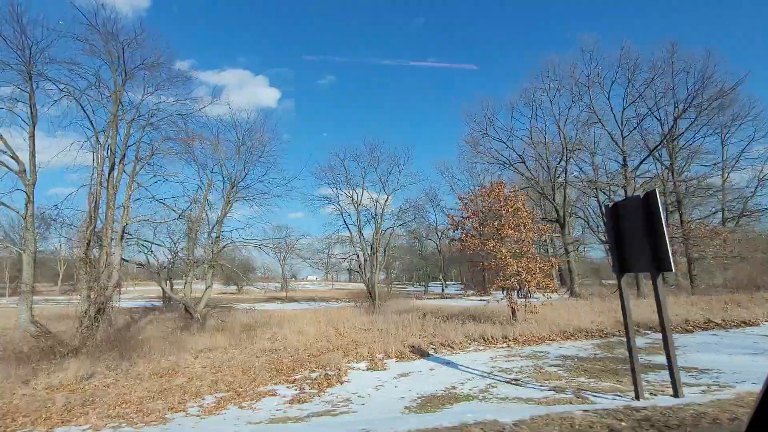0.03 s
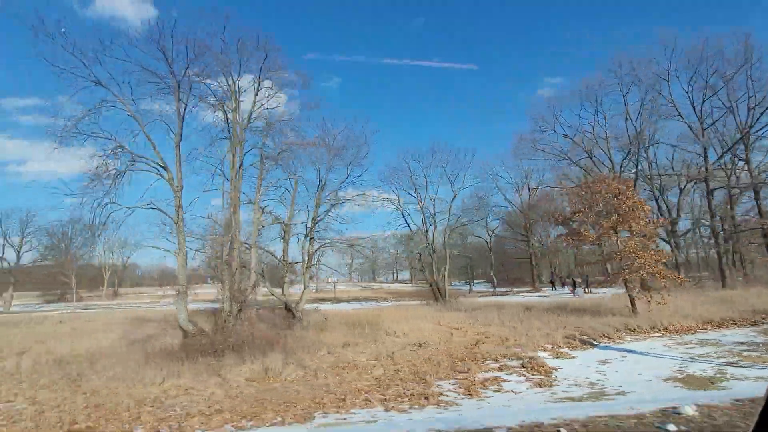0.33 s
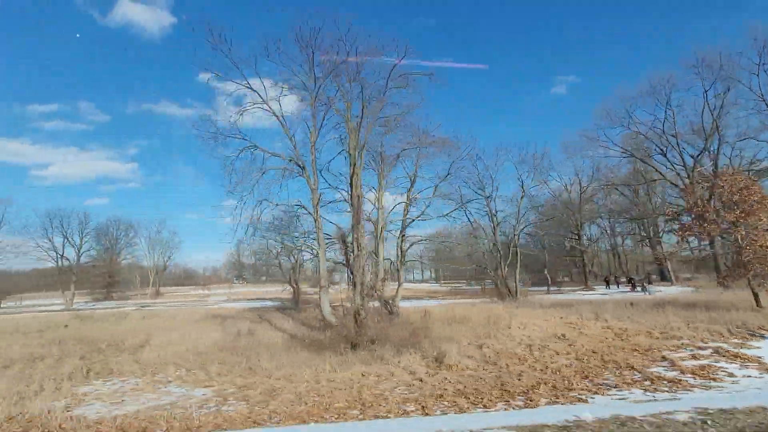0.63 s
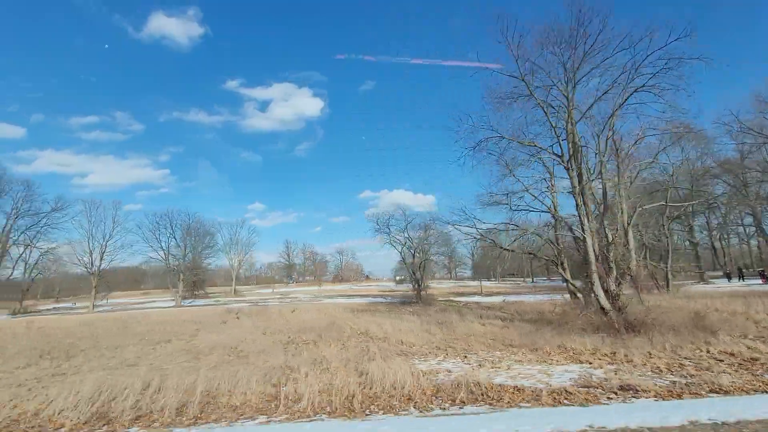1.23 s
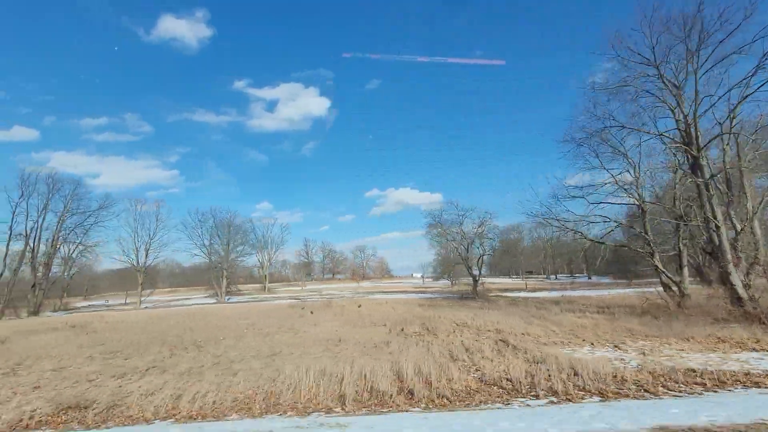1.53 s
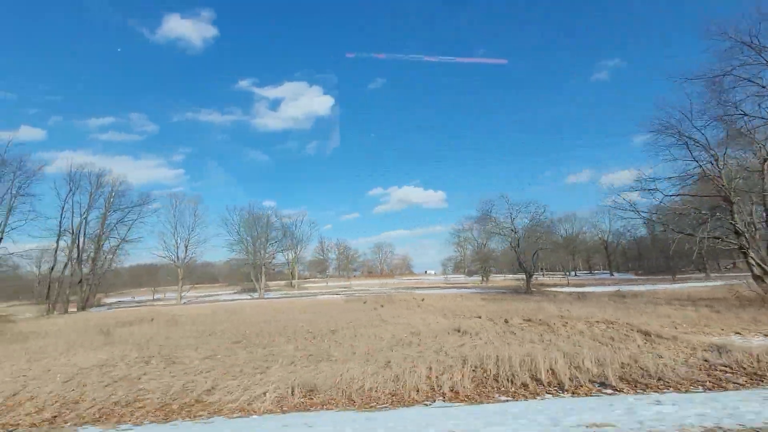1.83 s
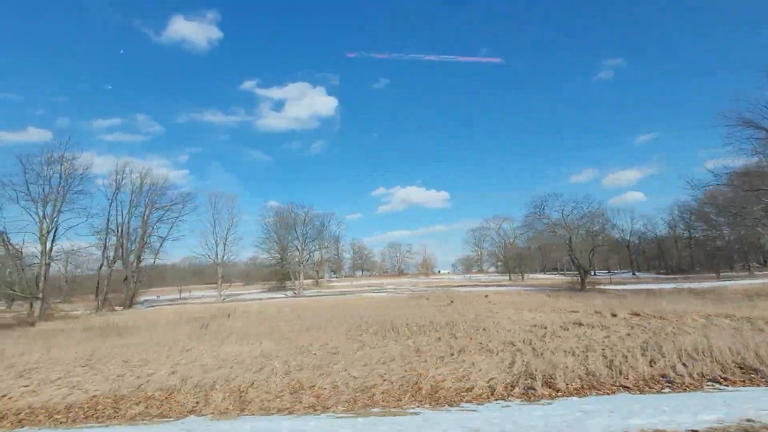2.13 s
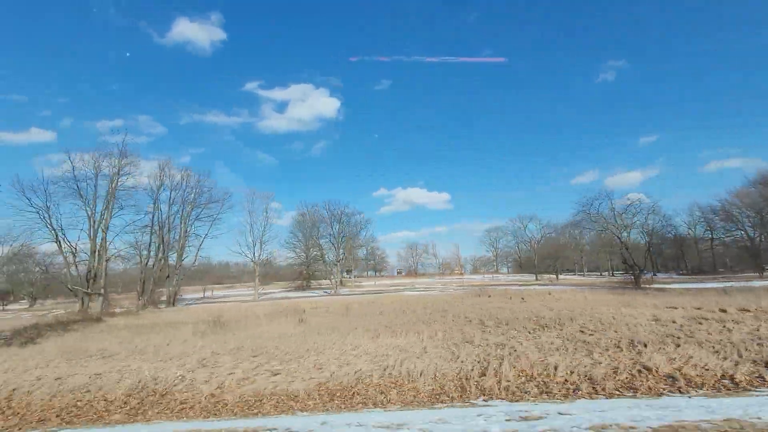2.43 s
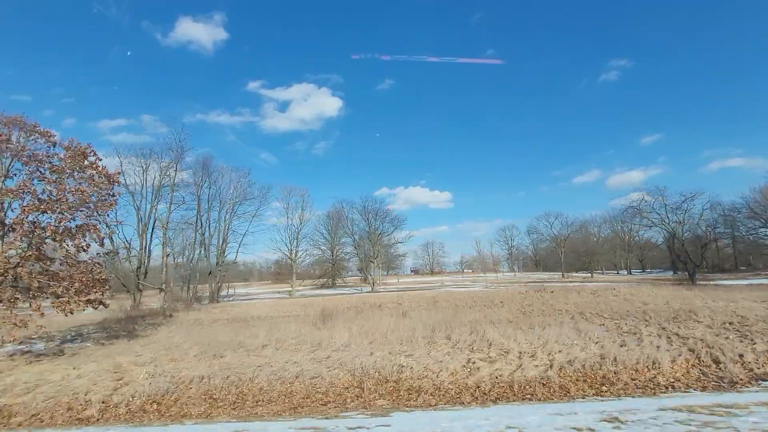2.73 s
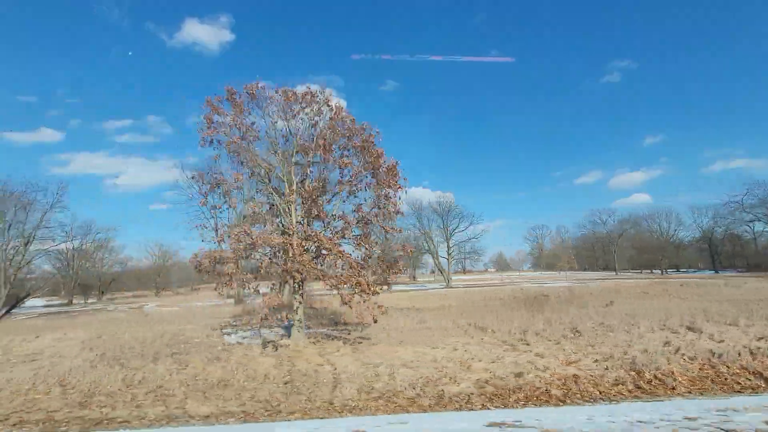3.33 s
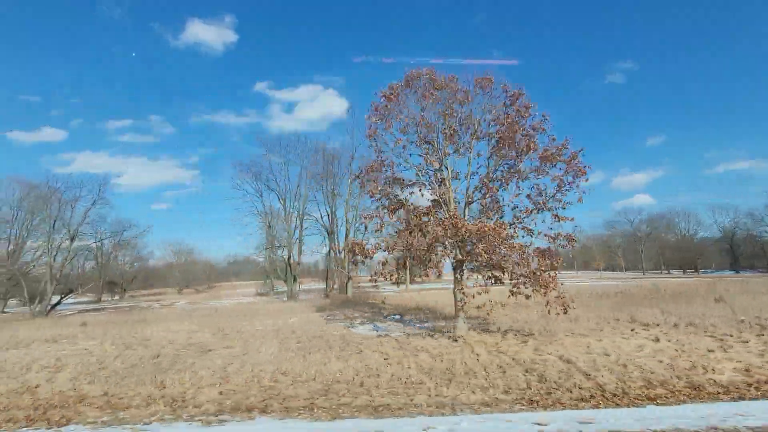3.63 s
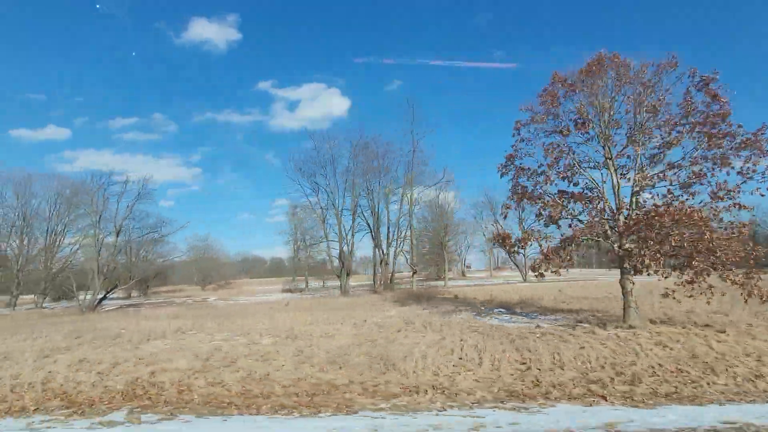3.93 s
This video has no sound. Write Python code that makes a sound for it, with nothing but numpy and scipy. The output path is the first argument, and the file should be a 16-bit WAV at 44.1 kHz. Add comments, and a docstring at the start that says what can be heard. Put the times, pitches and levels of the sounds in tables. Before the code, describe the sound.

Low rumble and tyre drone run throughout inside a car driving along a park road. Bumps thump early and again from the middle, with small rattles and two short scuffs near the left microphone, beside a side window.

```python
"""Inside a car rolling along a park road, close to a side window.
Uneven pavement heaves the body and booms in the cabin. The air in the tyres drones; the tread roars,
most over a coarse patch half way. Loose trim ticks and clinks on the bumps and squeaks faintly.
Two brief hissing scuffs pass close to the left microphone; air hisses thinly along the window."""
import sys
import numpy as np
from scipy import signal
from scipy.fft import rfft, irfft
from scipy.io import wavfile
from scipy.ndimage import uniform_filter1d

SR = 44100
rng = np.random.default_rng(int(sys.argv[2]) if len(sys.argv) > 2 else 0)


def pcm_store(signal):
    """Save signal as 16-bit PCM."""
    levels = np.round(np.clip(np.atleast_2d(signal), -1, 1) * 32767)
    wavfile.write(sys.argv[1], SR, levels.astype(np.int16).T)


N = 176400
T, HZ = np.arange(N) / SR, np.fft.rfftfreq(N, 1 / SR)

# pavement bumps: start_s, heave_db, shake_db, knock_db
BUMPS = [(0.324, -20.5, -17.5, -25.5), (.496, -14.5, -23, -20.5), (.69, -27.5, -32, -31),
         (1.675, -22.5, -24.5, -23.5), (1.84, -23.5, -19, -20.5), (1.914, -20, -13.5, -24.5),
         (2.094, -18, -25, -21.5), (2.22, -19.5, -40, -39), (2.667, -36, -22.5, -36),
         (2.697, -15.5, -37, -35), (2.818, -15, -25.5, -26), (3.23, -21.5, -20, -27.5),
         (3.409, -18, -24.5, -23), (3.6, -21, -34, -39), (3.921, -22.5, -29, -39)]
# body heave between bumps: time_s, level_db
HEAVE_LEVEL = [(0, -29), (1.5, -28), (2.2, -24), (2.5, -30), (4, -33)]
# body rumble: freq_hz, gain_db
RUMBLE_SPECTRUM = [(10, -33), (25, -7.5), (47, 6.5), (62, -4), (80, -8.5), (120, -55), (4000, -170)]
# cabin shake between bumps: time_s, gain_db
SHAKE_GAIN = [(0, -26.5), (1.6, -26.5), (2.0, -25.5), (2.35, -27), (4, -29)]
# cabin boom: freq_hz, gain_db
BOOM_SPECTRUM = [(40, -41.5), (75, -4), (125, -7), (160, -1.5), (192, -7.5), (262, -6.5), (305, -11),
                 (400, -12.5), (580, -23.5), (4000, -130)]
# cabin resonances: freq_hz, width_hz, lift_db
CABIN_MODES = [(82, 16, 7), (116, 23, 14), (445, 40, 2)]
# ringing of the tyre air: time_s, level_db
CAVITY_LEVEL = [(0, -38.5), (.48, -28), (.7, -35), (1.55, -39), (1.85, -27.5), (2.1, -28.5), (2.35, -36),
                (4, -38)]
# tyre air resonances: freq_hz, width_hz
CAVITY_MODES = [(229, 32), (249, 17)]
# road coarseness as roar gain: time_s, gain_db
SURFACE_GAIN = [(0, -49.5), (.5, -48.5), (1.05, -49), (1.65, -48.5), (1.95, -46), (2.13, -46),
                (2.29, -49.5), (2.48, -48), (2.8, -48), (3.1, -50), (3.42, -48.5), (4, -49)]
# tread roar per side: freq_hz, gain_db
ROAR_LEFT_SPECTRUM = [(150, -8), (500, -3.5), (690, 1), (880, -2.5), (1080, -7.5), (1500, -8.5),
                      (2000, -13), (2500, -19.5), (3100, -20), (4000, -25.5), (5200, -28), (6200, -36),
                      (7900, -34), (8500, -41), (15500, -48)]
ROAR_RIGHT_SPECTRUM = [(150, -8), (500, -3.5), (700, -2), (950, -2), (1250, -9), (1900, -9.5), (2500, -19),
                       (3550, -31), (4400, -26), (5200, -28), (6200, -34), (7800, -35), (8500, -41),
                       (15500, -50)]
# dry ticks: start_s, level_db, pan_db, decay_s, lowest_hz
# the row at 2.3188 s is the sharp onset of the second scuff, close to the left microphone
TICKS = [(.3102, -53.5, 3, .003, 3500), (.3294, -53.5, 2, .01, 5000), (.3434, -51.5, 1, .003, 4000),
         (.5012, -57, 0, .009, 3000), (.5256, -56, 1, .003, 4000), (1.5836, -45, 7, .003, 4000),
         (1.9305, -57, -1, .01, 10500), (2.1108, -52, -1, .008, 3300), (2.3188, -55, 14, .006, 3300),
         (2.538, -50, 6, .004, 7500), (2.6548, -53.5, 1, .004, 10500), (2.822, -58, 4, .004, 4500)]
# ticks and chatter: freq_hz, gain_db
TICK_SPECTRUM = [(4600, 0), (8000, -1), (10000, -4), (12500, 0), (15500, -2)]
# clinks of a loose part: start_s, level_db, decay_s
CLINKS = [(.3434, -53, .005), (.5012, -54.5, .02)]
# its resonances: freq_hz, width_hz, gain_db
CLINK_MODES = [(3900, 1400, -5), (4850, 1000, -1), (6900, 2600, -2)]
# scuffs: start_s, rise_s, hold_s, decay_s, left_db, pan_db
SCUFFS = [(1.557, .013, .018, .002, -44, 18), (2.3188, .001, .028, .022, -52, 24)]
# scuff hiss: freq_hz, gain_db
SCUFF_SPECTRUM = [(1500, -24), (3000, -9), (3800, 0), (5200, 3), (8100, 1), (8800, -4), (15500, -4.5)]
# trim squeaks: start_s, length_s
SQUEAK_TIMES = [(3.362, .018), (3.81, .12)]
# tone of each squeak: pitch_hz, width_hz, level_db
SQUEAK_TONES = [(7400, 3800, -62), (2970, 420, -61.5)]
# window hiss: freq_hz, gain_db
AIR_SPECTRUM = [(3000, 0), (7100, -3), (7850, 5), (8600, -5), (11200, 2), (12100, -7), (14300, -3)]
# window hiss: time_s, level_db
AIR_LEVEL = [(0, -76), (1.1, -75.5), (2.7, -79), (4, -84.5)]
# likeness of the two microphones: freq_hz, coherence
MIC_COHERENCE = [(120, .98), (250, .96), (310, .76), (460, .76), (550, .05), (670, -.4), (850, .05)]
# phase between them: freq_hz, left_lead_rad
MIC_PHASE = [(50, .48), (120, .18), (200, .18), (430, -.2), (1000, 0)]
# balance between them: freq_hz, left_minus_right_db
MIC_BALANCE = [(25, -3), (100, .5), (280, -1), (360, -4), (450, -4), (530, 0)]

HEAVE_COLUMN, SHAKE_COLUMN, KNOCK_COLUMN = 1, 2, 3
KNOCK_BASE_DB, KNOCK_DECAY_S = -27, .092
CONTACT_RISE_S = .0012


def amp(db):
    """Decibels to gain."""
    return 10 ** (np.asarray(db) / 20)


def unit(x):
    """Scale to rms 1."""
    return x / np.sqrt(np.mean(x ** 2) + 1e-20)


def over_hz(points, hz=HZ):
    """Interpolate over log frequency."""
    knots_hz, values = np.transpose(points)
    return np.interp(np.log(hz + 1), np.log(knots_hz + 1), values)


def over_time(points, time_s=T):
    """Interpolate over time."""
    return np.interp(time_s, *np.transpose(points))


def pan(db):
    """Stereo gains for a left-minus-right level."""
    return amp(np.array([[db], [-db]]) / 2)


def resonance_db(hz, width_hz):
    """Steep-sided peak."""
    return -20 * np.log10(1 + (2 * (HZ - hz) / width_hz) ** 2)


def mic_spectra(hz, shape):
    """Random spectra at the two microphones: alike in the bass, unrelated in the treble."""
    shared, separate = rng.standard_normal((2, *shape)) + 1j * rng.standard_normal((2, *shape))
    coherence = np.clip(over_hz(MIC_COHERENCE, hz), -1, 1)
    right = coherence * shared + np.sqrt(1 - coherence ** 2) * separate
    lag = np.exp(-1j * over_hz(MIC_PHASE, hz))
    tilt = amp(over_hz(MIC_BALANCE, hz) / 2)
    return np.array([shared * tilt, right * lag / tilt])


def noise(colour_db):
    """Coloured stereo noise, rms 1."""
    return unit(irfft(mic_spectra(HZ, HZ.shape) * amp(colour_db), N))


def steadied(x, samples=3000):
    """Flatten a noise's slow chance swells to rms 1."""
    power = uniform_filter1d(uniform_filter1d((x ** 2).mean(0), samples), samples)
    return x / np.sqrt(abs(power) + 1e-9)


def bump_envelope(base_db, column, decay_s, rise_s=.011):
    """Base shaking plus a quick rise and slower fall per bump, summed in power."""
    power = amp(base_db) ** 2
    for bump in BUMPS:
        age_s = T - bump[0]
        shape = np.clip(age_s / rise_s, 0, 1) * np.exp(-np.maximum(age_s - rise_s, 0) / decay_s)
        power = power + (amp(bump[column]) * shape) ** 2
    return np.sqrt(power)


def body_rumble():
    """The body shudders on its springs."""
    heave = bump_envelope(over_time(HEAVE_LEVEL), HEAVE_COLUMN, decay_s=.096)
    return steadied(noise(over_hz(RUMBLE_SPECTRUM))) * heave


def cabin_boom(split_hz=177):
    """Road shake drives the low cabin resonances; floor panels knock above them."""
    lift_db = sum(db / (1 + (2 * (HZ - hz) / width_hz) ** 2) for hz, width_hz, db in CABIN_MODES)
    boom = noise(over_hz(BOOM_SPECTRUM) + lift_db)
    low = irfft(rfft(boom) / (1 + (HZ / split_hz) ** 10), N)
    shake = bump_envelope(over_time(SHAKE_GAIN), SHAKE_COLUMN, decay_s=.049)
    knock = bump_envelope(KNOCK_BASE_DB, KNOCK_COLUMN, KNOCK_DECAY_S)
    return low.std() * steadied(low) * shake + (boom - low) * knock


def tyre_drone():
    """Air inside the tyres rings at two close modes."""
    ring = sum(noise(resonance_db(*mode)) for mode in CAVITY_MODES)
    return steadied(ring, samples=4000) * amp(over_time(CAVITY_LEVEL))


def tyre_roar(gain_db=4.5, patchy_db=.5, flicker_db=1):
    """Tread noise through the glass: slightly patchy, louder and brighter on coarse pavement."""
    size, hop = 512, 128
    frames, hz = N // hop + 5, np.fft.rfftfreq(size, 1 / SR)
    surface_db = over_time(SURFACE_GAIN, np.arange(frames) * hop / SR)[:, None]
    brighter_db = np.clip(hz / 4000, 0, 1) * (surface_db - surface_db.mean())
    drift = uniform_filter1d(rng.standard_normal((frames, len(hz))), size=24, axis=0)
    patches = unit(uniform_filter1d(drift, size=7, axis=1))
    flicker = unit(uniform_filter1d(rng.standard_normal((frames, 1)), size=8, axis=0))
    base_db = np.array([over_hz(ROAR_LEFT_SPECTRUM, hz), over_hz(ROAR_RIGHT_SPECTRUM, hz)])[:, None]
    colour_db = base_db + brighter_db + patchy_db * patches + flicker_db * flicker
    spectra = mic_spectra(hz, patches.shape) * amp(colour_db)
    _, roar = signal.istft(spectra.transpose(0, 2, 1), nperseg=size, noverlap=size - hop)
    return unit(roar[:, :N]) * amp(gain_db + over_time(SURFACE_GAIN))


def tick(start_s, level_db, pan_db, decay_s, lowest_hz, tail_db=-14, tail_s=.018):
    """Dry tick with a short cabin tail: loose trim, or the sharp onset of the second scuff."""
    age_s = np.maximum(T - start_s, 0)
    fall = np.exp(-age_s / decay_s) + amp(tail_db) * np.exp(-age_s / tail_s)
    shape = np.minimum(age_s / CONTACT_RISE_S, 1) * fall
    highpass_db = -10 * np.log10(1 + (lowest_hz / (HZ + 1)) ** 10)
    return noise(over_hz(TICK_SPECTRUM) + highpass_db) * shape * amp(level_db) * pan(pan_db)


def clink(start_s, level_db, decay_s):
    """A small hard part, jolted, rings briefly."""
    age_s = np.maximum(T - start_s, 0)
    shape = np.minimum(age_s / CONTACT_RISE_S, 1) * np.exp(-age_s / decay_s)
    ring = sum(amp(db) * noise(resonance_db(hz, width_hz)) for hz, width_hz, db in CLINK_MODES)
    return unit(ring) * shape * amp(level_db)


def scuff(start_s, rise_s, hold_s, decay_s, left_db, pan_db, grain_db=.5):
    """Short grainy hiss of something rubbing beside the left microphone."""
    age_s = T - start_s
    shape = np.clip(age_s / rise_s, 0, 1) * np.exp(-np.maximum(age_s - rise_s - hold_s, 0) / decay_s)
    grain = unit(uniform_filter1d(rng.standard_normal(N), size=50))
    hiss = unit(noise(over_hz(SCUFF_SPECTRUM)) * amp(grain_db * grain))
    return hiss * shape * amp([[left_db], [left_db - pan_db]])


def trim_squeak(start_s, length_s, pitch_hz, width_hz, level_db):
    """Faint fuzzy squeak of trim, swelling and fading."""
    progress = np.clip((T - start_s) / length_s, 0, 1)
    shape = np.sqrt(abs(np.sin(np.pi * progress)))
    return noise(resonance_db(pitch_hz, width_hz)) * shape * amp(level_db) * pan(db=4)


def trim_chatter(level_db=-75, rate_per_s=900, spread_db=2.5, decay_s=.002, jolt_db=-6.5):
    """Many tiny contacts, louder on coarse road and after each bump."""
    hits = (rng.random(N) < rate_per_s / SR) * amp(spread_db * np.minimum(rng.exponential(1, N), 3))
    shape = signal.lfilter([1], [1, -np.exp(-1 / (decay_s * SR))], hits)
    surface_db = over_time(SURFACE_GAIN)
    coarseness = amp(7.6 * (surface_db - surface_db.max()))  # 7.6 dB per dB of roar
    knock = bump_envelope(KNOCK_BASE_DB, KNOCK_COLUMN, KNOCK_DECAY_S)
    jolt = (knock - knock.min()) / np.ptp(knock)
    drive = np.hypot(coarseness, amp(jolt_db) * jolt)
    return amp(level_db) * unit(noise(over_hz(TICK_SPECTRUM)) * shape * drive)


def air_hiss():
    """Thin hiss of air along the window, to the left."""
    return noise(over_hz(AIR_SPECTRUM)) * amp(over_time(AIR_LEVEL)) * pan(db=9)


def glass_reflections(x, count=10, echo_db=-24.5, longest_s=.011, highpass_hz=1000):
    """Early window reflections ripple the spectrum at each microphone; rms is kept."""
    delays_s = rng.uniform(.05, 1, (count, 2, 1)) * longest_s
    echoes = sum(np.exp(-2j * np.pi * HZ * delay_s) for delay_s in delays_s)
    response = 1 + amp(echo_db) * echoes * HZ / (HZ + highpass_hz)
    return x.std() * unit(irfft(rfft(x) * response, N))


def scene():
    """Road noise with small cabin sounds on top."""
    road = body_rumble() + cabin_boom() + tyre_drone() + glass_reflections(tyre_roar() + air_hiss())
    chatter = trim_chatter()
    ticks = sum(tick(*row) for row in TICKS)
    clinks = sum(clink(*row) for row in CLINKS)
    squeaks = sum(trim_squeak(*when, *tone) for when, tone in zip(SQUEAK_TIMES, SQUEAK_TONES))
    scuffs = sum(scuff(*row) for row in SCUFFS)
    return road + ticks + clinks + scuffs + squeaks + chatter


def record(dry, fade_s=.004, cutoff_hz=15850):
    """Soft ends, steep low-pass."""
    faded = dry * np.clip(np.minimum(T, T[-1] - T) / fade_s, 0, 1)
    lowpass = signal.firwin(511, cutoff_hz, window=("kaiser", 9), fs=SR)
    return signal.oaconvolve(faded, lowpass[None], "same")


dry = scene()
out = record(dry)
pcm_store(out)
```